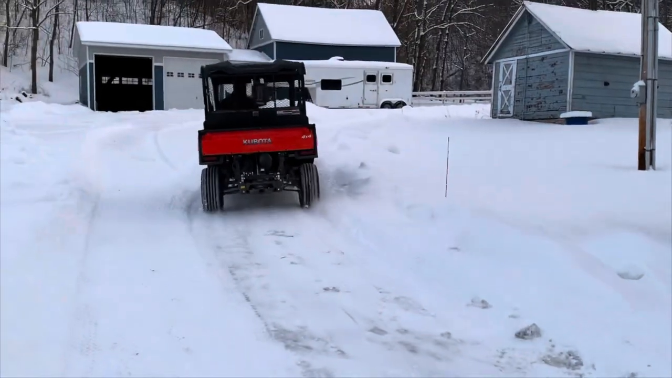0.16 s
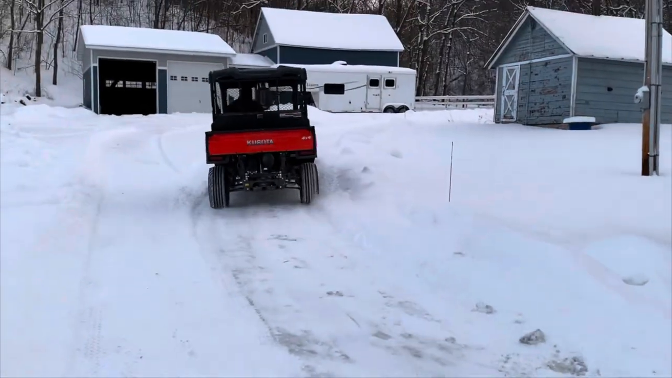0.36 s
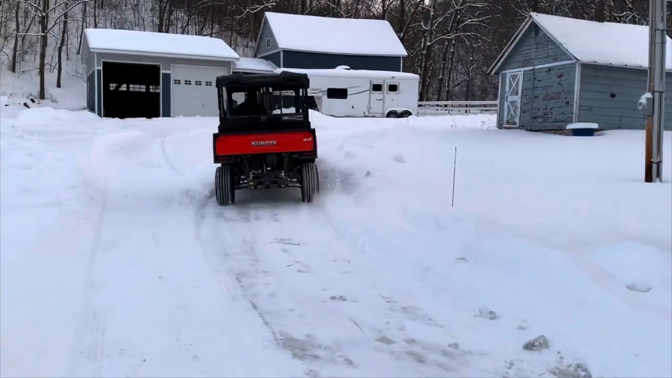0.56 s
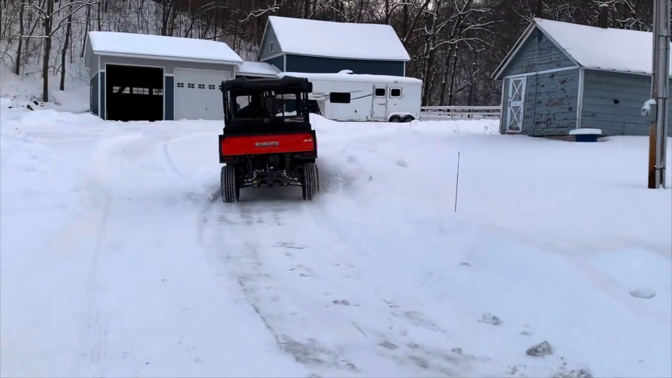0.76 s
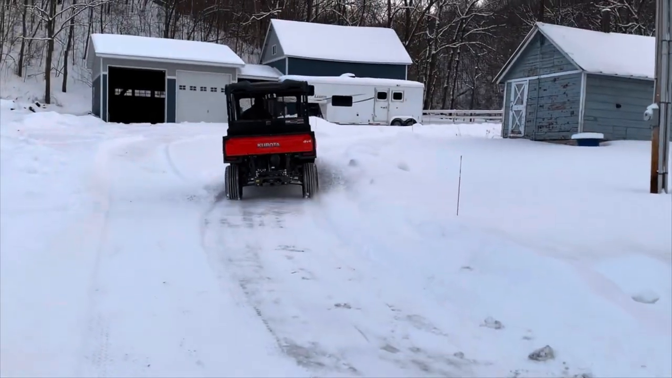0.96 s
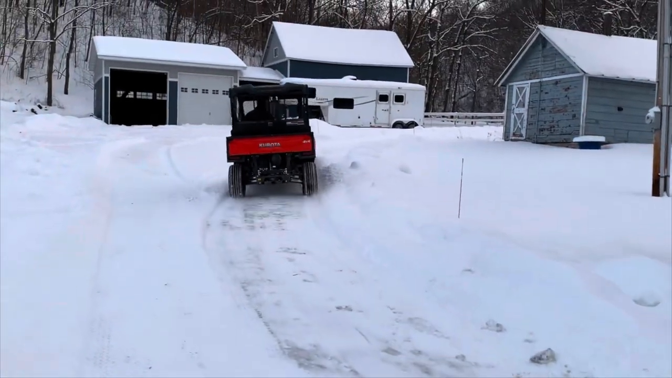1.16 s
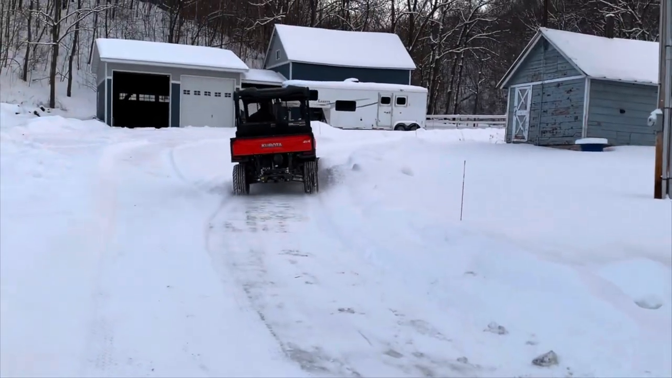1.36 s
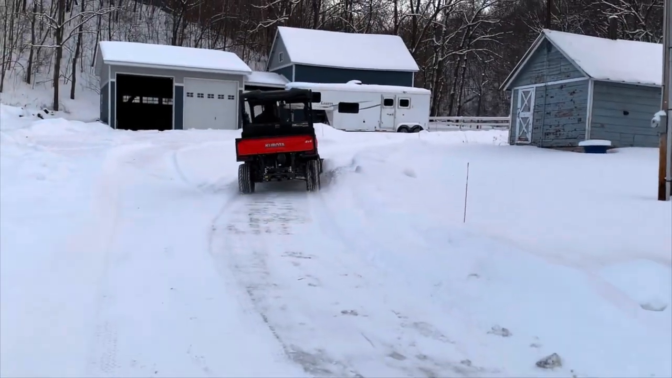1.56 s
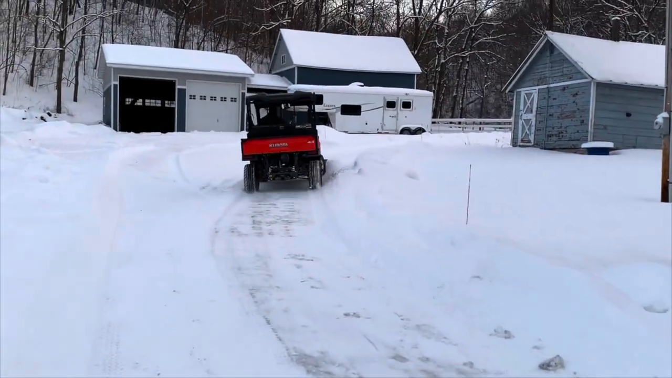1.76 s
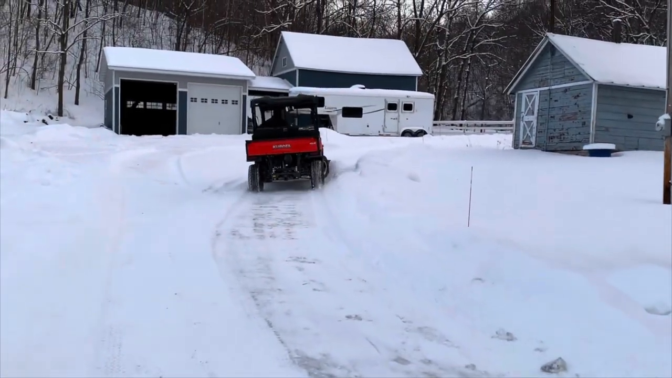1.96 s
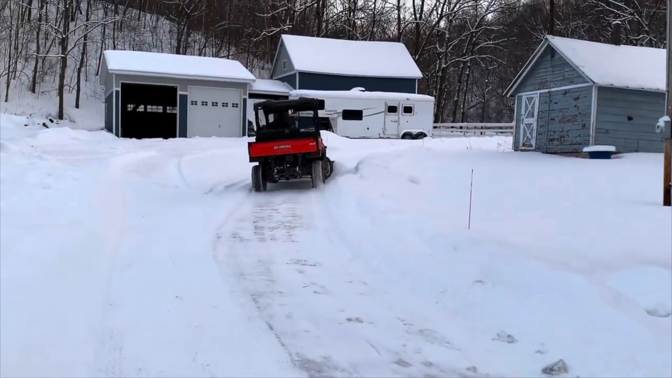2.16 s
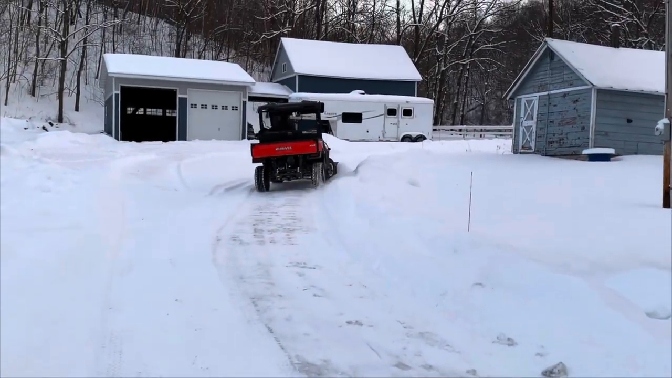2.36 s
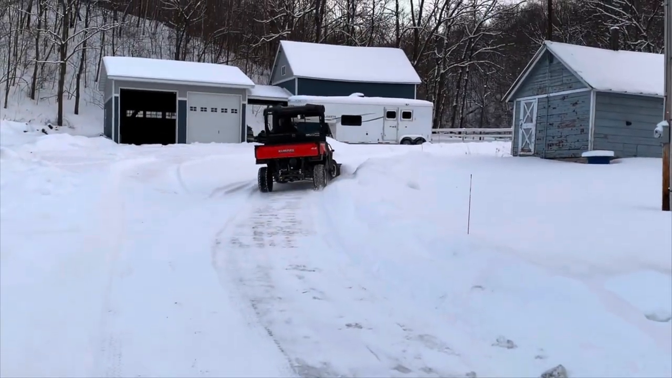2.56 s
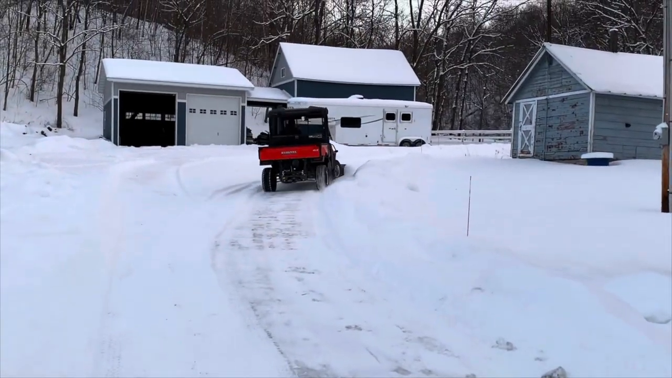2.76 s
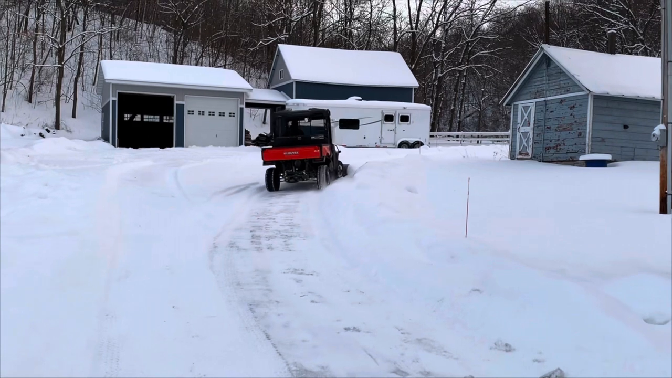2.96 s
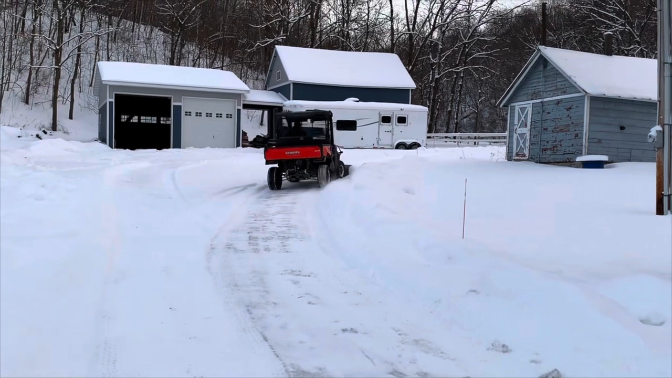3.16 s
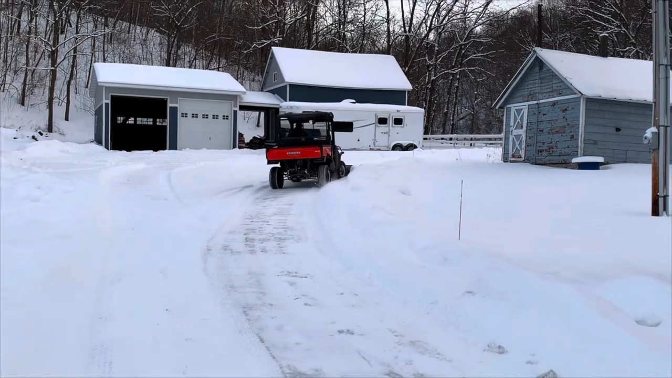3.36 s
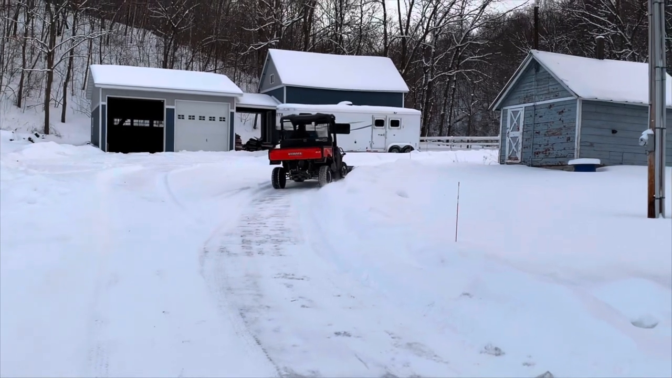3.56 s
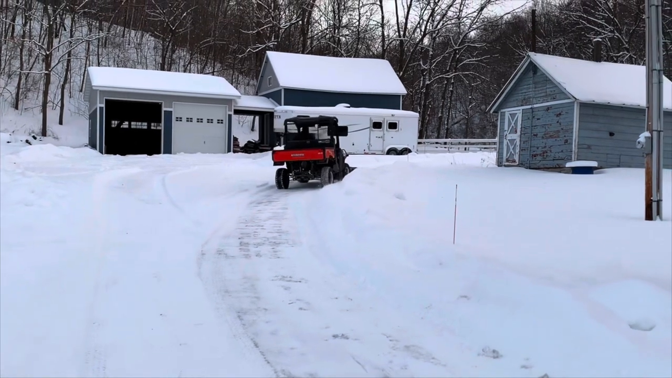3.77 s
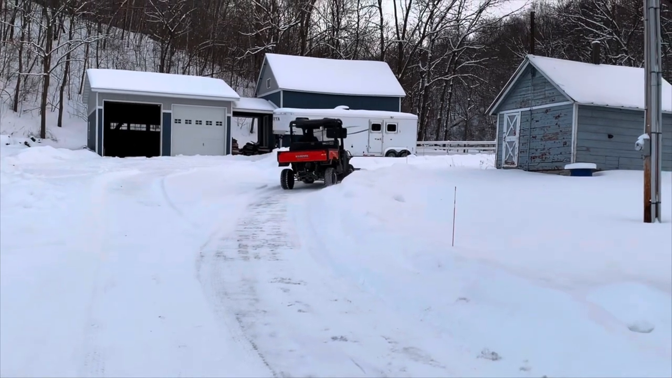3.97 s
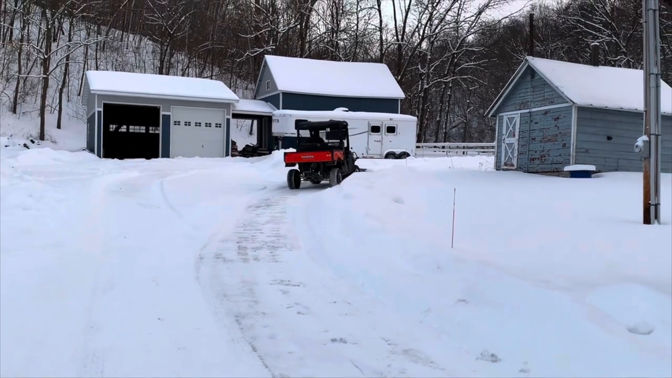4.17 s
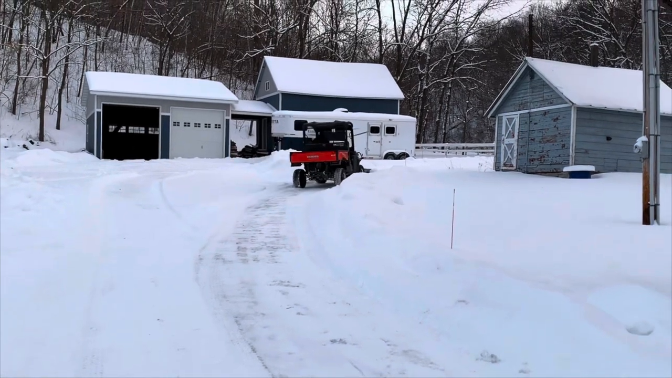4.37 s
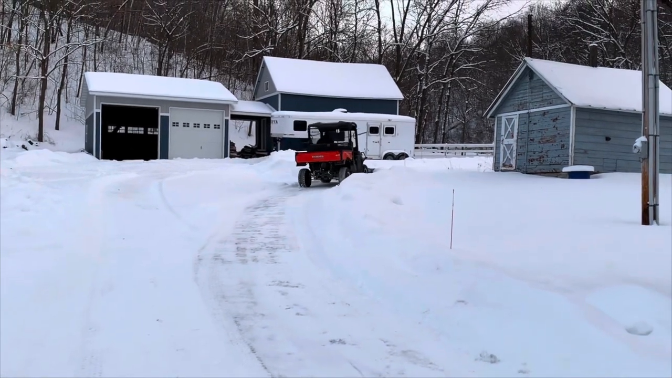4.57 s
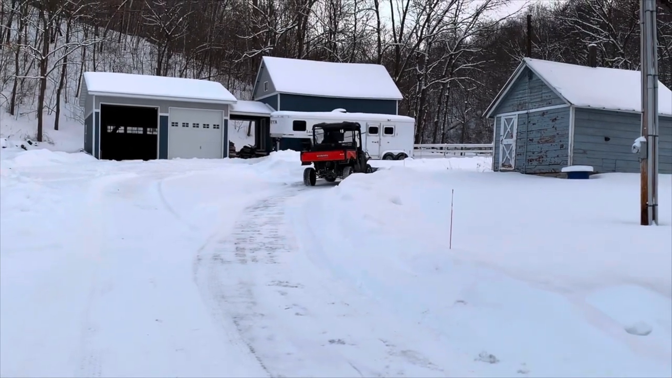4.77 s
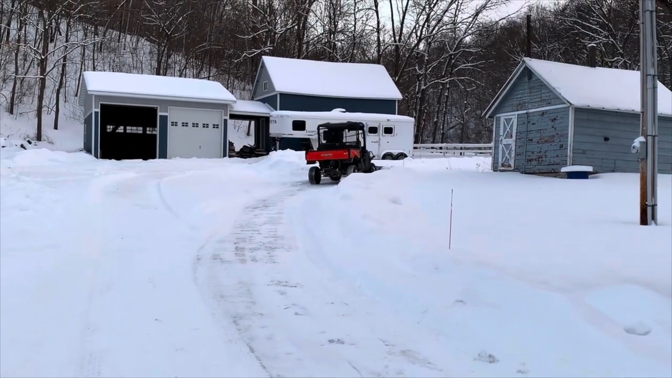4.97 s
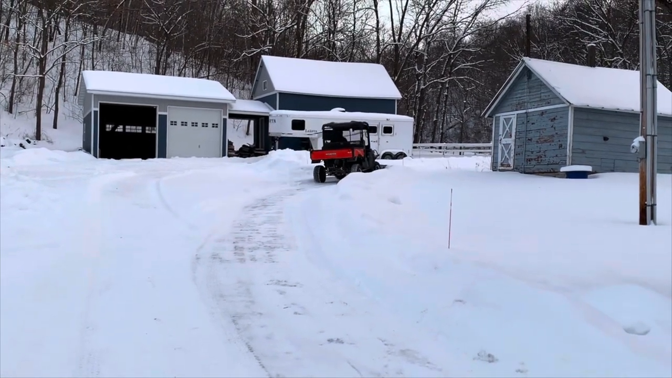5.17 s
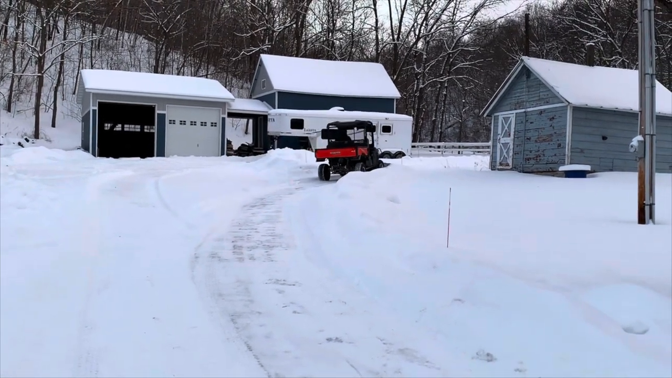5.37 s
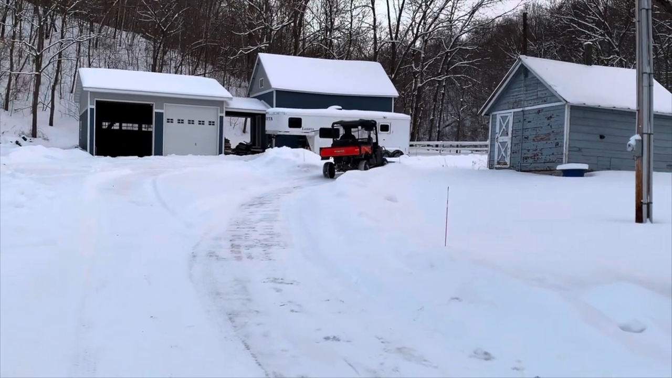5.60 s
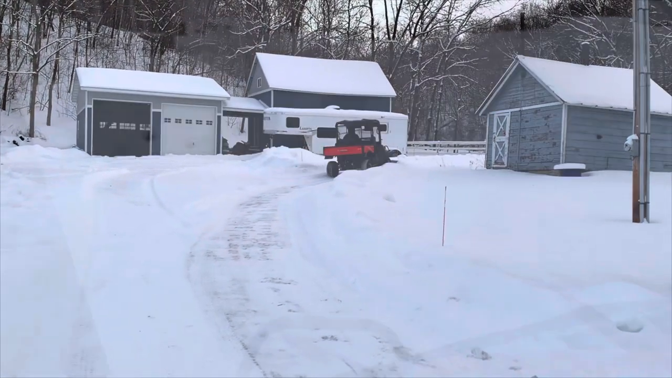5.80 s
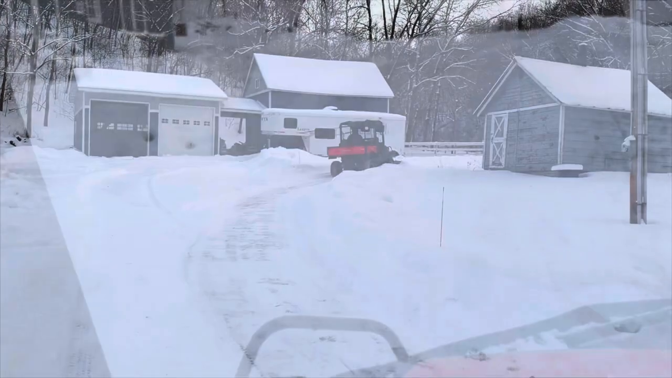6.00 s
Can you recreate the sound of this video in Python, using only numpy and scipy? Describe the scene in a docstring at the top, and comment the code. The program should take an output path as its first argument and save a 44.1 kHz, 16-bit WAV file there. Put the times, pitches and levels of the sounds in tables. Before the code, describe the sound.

Outdoors in a snowy yard, a single-cylinder engine chugs steadily and gradually moves away from the microphone. It opens with a thud of wind and a brief sheet-metal rattle, followed by a light falling whine. The engine then works harder, with sharper knocking and ticking, before easing near the end. Underneath, tyres and a plough blade softly crush snow, while low gusts rumble and sheds return dull echoes.

```python
"""A single-cylinder utility vehicle pushes a plough away up a snowy driveway, firing about 28 times a
second: each firing thumps the muffler, knocks the block and lets out a puff of hiss. At first a gust
buffets two close microphones and a metal guard rattles hard, settling within a second. The gear whine
then sinks through its housing's resonance. From 2.6 s the engine labours and the vehicle turns its flank.
To the end, tyres and blade crush snow, gusts come and go, and sheds throw back dull echoes."""
import sys
import numpy as np
from scipy import signal
from scipy.fft import rfft, irfft
from scipy.io import wavfile
from scipy.ndimage import uniform_filter1d

SR = 44100
rng = np.random.default_rng(int(sys.argv[2]) if len(sys.argv) > 2 else 0)


def unload_wav(signal):
    """Save mono or channel-first audio to the path in sys.argv[1] as 16-bit WAV at rate SR, clipped to [-1, 1]."""
    wavfile.write(
        sys.argv[1],
        SR,
        np.round(np.clip(np.atleast_2d(signal).T, -1, 1) * 32767).astype(np.int16),
    )


N = 266364
CRUISE_PER_S = 28.05   # firings at the governed speed
SHARED = [[1], [0]]   # puts a signal in the row of the sound field that reaches both microphones


def from_db(db):
    """Amplitude ratio of a level in decibels."""
    return 10 ** (np.asarray(db) / 20)


def rms_one(x):
    """Normalisation to an rms of 1."""
    return x / np.sqrt(np.mean(x ** 2) + 1e-20)


def seconds():
    """The time of each sample."""
    return np.arange(N) / SR


def in_time(rows):
    """Linear interpolation of each column of a curve, sample by sample."""
    time_s, *columns = np.transpose(rows)
    return [np.interp(seconds(), time_s, column) for column in columns]


def in_frequency(rows):
    """Interpolation of each column of a spectrum over log frequency, bin by bin."""
    hz, *columns = np.transpose(rows)
    bins_hz = np.maximum(np.arange(N // 2 + 1) * SR / N, 1)
    return [np.interp(np.log(bins_hz), np.log(hz), column) for column in columns]


def noise(spectrum):
    """Spectral shaping: two uncorrelated noises of one colour; rms 1."""
    level_db, = in_frequency(spectrum)
    white = rng.standard_normal((2, N))
    return rms_one(irfft(rfft(white) * from_db(level_db), N))


def drift(rate):
    """Random modulation: a line through rate unit-normal values a second."""
    return np.interp(seconds() * rate, np.arange(4096), rng.standard_normal(4096))


def ring(drive, hz, t60):
    """Damped oscillator: a unit impulse starts a sine of height 1 that falls 60 dB in t60 seconds."""
    decay = from_db(-60 / (t60 * SR))
    step = 2 * np.pi * hz / SR
    return signal.lfilter([0, np.sin(step)], [1, -2 * decay * np.cos(step), decay * decay], drive + 1e-18)


def metal(drive, modes):
    """Modal superposition: the resonances of a casting ring side by side, in alternating polarity."""
    return sum((-1) ** k * from_db(db) * ring(drive, hz, t60) for k, (hz, db, t60) in enumerate(modes))


def blows(rows):
    """Impulse excitation: one click for each (time_s, level_db)."""
    clicks = np.zeros(N)
    for time_s, db in rows:
        clicks[round(time_s * SR)] = from_db(db)
    return clicks


def accents(rows, half_width_s):
    """Amplitude modulation: the level jumps briefly at each (time_s, boost_db)."""
    return from_db(sum(db * np.exp(-((seconds() - time_s) / half_width_s) ** 2) for time_s, db in rows))


def strokes(cycle):
    """Impulse train: one click whenever a cycle is complete."""
    return np.diff(np.floor(cycle), prepend=np.floor(cycle[0]))


def per_firing(cycle, spread_db):
    """Cycle-to-cycle variation: a random gain for every engine cycle."""
    gains = from_db(spread_db * rng.standard_normal(256))
    return gains[np.floor(cycle).astype(int) % 256]


def burst(cycle, centre, rise, fall, rest_db, uneven_db, early_db):
    """Power addition: an early tick, a swell and a resting level form one envelope; times in cycles."""
    tick_at, tick_width = 0.094, 0.037
    swell_cycle = cycle - centre + .5
    offset = swell_cycle % 1 - .5
    swell = np.exp(-np.abs(offset) / np.where(offset < 0, rise, fall))
    swell *= per_firing(swell_cycle, uneven_db)
    tick = from_db(early_db) * np.exp(-((cycle % 1 - tick_at) / tick_width) ** 2)
    tick *= per_firing(cycle, spread_db=3)
    return rms_one(np.sqrt(swell ** 2 + tick ** 2 + from_db(rest_db) ** 2))


# wind between gusts: time_s, level_db
BREEZE = [(0, -42), (2.3, -36.5), (4.15, -31.5), (4.3, -37.5), (6.04, -45.5)]
# gusts: start_s, end_s, level_db
GUSTS = [(0, 0.13, -29.5), (0.2, 0.477, -35.5), (0.872, 1.701, -35), (2.479, 2.947, -31),
         (2.957, 3.498, -34), (3.51, 4.22, -32.5), (4.72, 4.934, -36), (5.824, 6.037, -36)]
# spectra of the deep rumble and of the flutter that hard gusts add: frequency_hz, density_db
RUMBLE = [(15, -39), (30, -17), (45, 2.5), (80, -2.5), (110, -2.5), (150, -18.5), (300, -41), (700, -79)]
FLUTTER = [(45, -25), (80, -3.5), (140, -2), (190, -4), (300, -26.5), (700, -47)]
# single eddies: time_s, peak_db, pitch_hz
BUFFETS = [(0.011, -14, 130), (0.035, -27, 107), (0.066, -18, 109), (0.114, -23, 83), (0.137, -21, 108),
           (0.957, -31, 125), (1.128, -19, 111), (2.493, -21, 115), (2.512, -34, 82.8), (2.561, -19, 139),
           (2.665, -33, 79), (2.678, -18, 80.4), (2.7, -26, 84.6), (2.73, -32, 98), (2.767, -23, 95.2),
           (2.821, -21, 112), (2.853, -25, 89.7), (2.902, -32, 100), (3.5765, -26, 119), (3.649, -22.5, 97),
           (3.681, -26, 84), (3.723, -25, 125), (3.79, -26, 129), (3.817, -31, 125), (3.919, -27, 85),
           (3.969, -22, 77), (4.069, -23, 77.5), (4.167, -23, 87.5), (5.83, -23.5, 85.65), (5.865, -31, 80),
           (5.9247, -19, 81.4), (5.947, -20, 84), (5.967, -26, 90.5), (6.0216, -14.5, 82.6)]
def wind():
    """Turbulence: gusts rumble, brighter when strong; eddies push the microphones for a swing or two."""
    edge_s, half_width_periods = 0.014, 0.79   # of a gust; of a buffet
    t = seconds()
    breeze_db, = in_time(BREEZE)
    gusts = [from_db(db) * np.clip(np.minimum(t - start, end - t) / edge_s + .5, 0, 1)
             for start, end, db in GUSTS]
    strength = np.maximum(from_db(breeze_db), np.max(gusts, axis=0))
    rumble = noise(RUMBLE) * strength
    flutter = from_db(23) * noise(FLUTTER) * strength ** 1.863   # grows faster than the rumble
    thuds = np.zeros(N)
    for time_s, db, hz in BUFFETS:
        periods = (t - time_s) * hz
        thuds += from_db(db) * np.exp(-(periods / half_width_periods) ** 2) * np.cos(2 * np.pi * periods)
    return rumble + flutter + thuds * SHARED


# spectrum of crushed snow: frequency_hz, density_db
SNOW = [(100, -23), (300, -8), (470, -14), (850, -4), (1800, 4), (2900, -4.5), (6000, -14), (10000, -20),
        (16000, -53)]
# tyres and blade in the snow: time_s, level_db
CRUSH = [(0, -40.5), (1, -42.5), (2, -42), (3, -43), (4, -43), (5, -43.5), (5.6, -47), (6.04, -46.5)]
def snow():
    """Granular noise: snow is crushed in small uneven grains."""
    level_db, = in_time(CRUSH)
    return noise(SNOW) * from_db(level_db + 4.0 * drift(300))


# echoes from the sheds: delay_s, gain_db
ECHOES = [(0.046, -15), (0.117, -46), (0.185, -10.5)]
def yard(direct, wall_cut_hz):
    """Reflection: the sheds add a few late, dull copies to the direct sound."""
    dull = signal.sosfilt(signal.butter(1, wall_cut_hz, fs=SR, output="sos"), direct)
    return direct + sum(from_db(db) * np.pad(dull, [(0, 0), (round(delay_s * SR), 0)])[:, :N]
                        for delay_s, db in ECHOES)


# microphone pair: frequency_hz, right_lag_ms, correlation (-1 to 1), left_minus_right_db
PAIR = [(30, .05, 0.62, -1.5), (122, 0.022, 0.83, 1.06), (483, 0.15, 1, 0), (1010, 0.079, 0.78, 4),
        (1420, 0.066, 0.96, 1.5), (2210, 0.058, 0.34, 0.1), (2790, 0.18, 0.4, -0.5), (4000, 0.23, 0.64, 0),
        (5800, 0.193, -0.72, -9.5), (6320, 0.16, 0.73, 0.5), (6960, 0.18, 1, 0), (11000, 0.18, 1, 0),
        (13300, 0.191, 0.95, -0.5), (16000, 0.182, 0.98, 1)]
def microphones(field):
    """Partial coherence: the pair shares the first row and differs by the second; the right one lags."""
    lag_ms, correlation, balance_db = in_frequency(PAIR)
    correlation = np.clip(correlation, -.997, .997)
    shared, apart = rfft(field) * np.sqrt([(1 + correlation) / 2, (1 - correlation) / 2])
    bins_hz = np.arange(N // 2 + 1) * SR / N
    delay = np.exp(-2j * np.pi * bins_hz * lag_ms / 1000)
    left = (shared + apart) * from_db(balance_db / 2)
    right = (shared - apart) * delay * from_db(-balance_db / 2)
    return irfft(np.array([left, right]), N)


def nearness():
    """Spherical spreading: pressure falls as one over the distance; 1 at the start."""
    start_m, away_m_per_s = 4.8, 1.485
    return start_m / (start_m + away_m_per_s * seconds())


def turned():
    """Directivity: the side facing the listener goes from tail (0) to flank (1) as the vehicle turns."""
    start_s, length_s = 2.6, 2.6
    return np.clip((seconds() - start_s) / length_s, 0, 1)


# engine speed: time_s, firings_per_s
SPEED = [(0.0, 27.56), (0.18, 28.1), (0.84, 27.76), (1.02, 27.03), (2.0, 28.94), (2.38, 28.16), (2.6, 29.5),
         (2.8, 29.15), (2.96, 29.9), (3.46, 29.63), (3.74, 28.77), (4.36, 28.29), (4.84, 28.3),
         (5.34, 29.46), (6.04, 29.61)]
def engine_cycle():
    """Phase is the integral of frequency; the exhaust opens at each whole number of cycles."""
    speed, = in_time(SPEED)
    return np.cumsum(speed) / SR + .45


# how hard the engine works against the snow: time_s, knock_db
LOAD = [(0, -1), (0.2, -5.5), (0.5, -7.5), (0.78, -4), (1.25, -3.5), (1.55, 2), (1.95, -1), (2.2, -4.5),
        (2.6, 4.5), (3.45, 6), (4.0, 6), (4.8, 1.3), (5.35, -5), (6.04, -7.5)]
def radiated(level_db, flank_db, load_share, rev_db):
    """Radiation: a part's gain follows distance, heading, load and revs (rev_db per extra firing/s)."""
    load_db, = in_time(LOAD)
    speed, = in_time(SPEED)
    gain_db = level_db + flank_db * turned() + load_share * load_db + rev_db * (speed - CRUISE_PER_S)
    return nearness() * from_db(gain_db)


def thump(cycle, modes, lag):
    """Periodic excitation: a push per firing, lag cycles late, rings low modes; rms 1."""
    pulses = strokes(cycle - lag) * per_firing(cycle - lag, spread_db=0.37)
    tone = sum(np.sign(polarity) * from_db(db) * ring(pulses, hz, t60) for hz, db, t60, polarity in modes)
    bass_cut = signal.butter(2, 59.0, "high", fs=SR, output="sos")   # a small source radiates little bass
    return rms_one(signal.sosfilt(bass_cut, tone))


# gear mesh, sinking with the ground speed: time_s, pitch_hz
MESH_PITCH = [(0, 706), (1.1, 631.6), (1.5, 624), (1.95, 617.6), (2.3, 611), (2.62, 619), (2.85, 596.3),
              (4.6, 580), (6.04, 569)]
# its octave, at the start distance: time_s, level_db
MESH_OCTAVE = [(0.5, -52), (0.9, -51), (1.3, -47), (1.8, -55), (3.7, -52), (4.35, -46), (4.65, -52),
               (5.5, -63)]
def gear_whine():
    """Forced resonance: the mesh tone peaks as it meets the housing's mode; its octave sings above."""
    housing_hz, bandwidth_hz, on_resonance_db = 624, 18.6, -43
    hz, = in_time(MESH_PITCH)
    octave_db, = in_time(MESH_OCTAVE)
    phase = 2 * np.pi * np.cumsum(hz * (1 + 0.00793 * drift(45))) / SR
    resonance = 1 / np.hypot(1, 2 * (hz - housing_hz) / bandwidth_hz)
    tone = from_db(on_resonance_db) * resonance * np.sin(phase) + from_db(octave_db) * np.sin(2 * phase)
    return np.sqrt(2) * nearness() * tone * from_db(4.2 * drift(30))


# cargo bed modes: pitch_hz, gain_db, t60_s, polarity
BED = [(251.4, -1, 0.45, 1), (277, -10, 0.098, -1), (317.5, -2, 0.32, 1), (364.6, -1.5, 0.092, -1)]
def cargo_bed(cycle):
    """Plate resonance: the bed drums with each firing."""
    gain = radiated(level_db=-40.5, flank_db=-7.5, load_share=0.23, rev_db=-3.5)
    return gain * thump(cycle, BED, lag=0.2514)


# spectrum of the panels: frequency_hz, density_db
BODYWORK = [(130, -34), (210, -2), (335, 2.5), (440, -12.5), (560, -7.5), (800, -5.5), (1150, -19.5),
            (1500, -6), (2800, -24.5)]
def bodywork(cycle):
    """Structure-borne sound: the panels buzz after each firing."""
    gain = radiated(level_db=-34.5, flank_db=-6, load_share=0.15, rev_db=0.97)
    buzz = gain * noise(BODYWORK)
    return buzz * burst(cycle, centre=0.3, rise=0.07, fall=0.52, rest_db=2.0, uneven_db=4.5, early_db=-6)


# spectrum of the guard: frequency_hz, density_db
GUARD = [(450, -29), (650, -12), (830, -0.5), (900, 6.5), (985, 7.5), (1060, 0), (1250, -5.5),
         (1700, -24.5)]
# jolts that make it clank: time_s, boost_db
CLANKS = [(0.358, 11), (0.75, 9), (1.794, 13.5), (1.865, 3), (2.666, 9)]
def guard(cycle):
    """Forced vibration: engine and jolts make a sheet-metal guard rasp near one pitch, hard at first."""
    extra_db, settled_s, fade_s = 8, 0.99, 0.74
    unsettled = np.clip((settled_s - seconds()) / fade_s, 0, 1)
    gain = radiated(level_db=-46, flank_db=1.5, load_share=-0.15, rev_db=1) * from_db(extra_db * unsettled)
    rasp = gain * noise(GUARD) * accents(CLANKS, half_width_s=0.009)
    return rasp * burst(cycle, centre=0.41, rise=0.26, fall=0.29, rest_db=-12, uneven_db=1.5, early_db=-1.5)


# spectrum of the bright hiss puffs as heard, with a narrow dip near 8.4 kHz: frequency_hz, density_db
HISS = [(1500, -32), (2800, -20), (5000, -1.5), (6400, -5), (7400, 1), (8400, -17), (9500, 3.5), (10300, 7),
        (11400, 4), (13000, 3), (16000, -0.5)]
# strength of the puffs: time_s, relative_level_db
PUFFS = [(0.0, -44), (0.2, -47), (0.42, -47), (0.65, -46.5), (0.75, -41), (1.1, -46.5), (1.32, -48.5),
         (1.52, -42.5), (1.92, -51), (2.15, -49), (2.72, -45.5), (2.92, -46), (3.2, -46), (3.45, -50.5),
         (3.6, -48.5), (4.08, -52.5), (4.3, -49), (4.5, -52), (4.75, -49), (5.25, -55), (5.6, -52),
         (6.0, -56.5)]
def exhaust_hiss(cycle):
    """Jet noise: gas leaves the tailpipe in short bright puffs."""
    puff_db, = in_time(PUFFS)
    hiss = from_db(puff_db + 5) * noise(HISS)
    return hiss * burst(cycle, centre=0.25, rise=0.11, fall=0.23, rest_db=-14, uneven_db=2.4, early_db=-7)


# knocks within one engine cycle: position_cycles, level_db
KNOCKS = [(0.111, -11.5), (0.25, -7), (0.322, -11.5)]
def clatter(cycle, lead, fall, knock_db, rest_db, uneven_db, early_db):
    """Driving force on the metal: combustion shakes it, valves and piston add a cluster of knocks."""
    jitter_cycles = 0.009
    cycle = cycle + lead
    shake = rng.standard_normal((2, N))
    shake *= burst(cycle, centre=0.28, rise=0.11, fall=fall, rest_db=rest_db, uneven_db=1, early_db=early_db)
    knocks = sum(from_db(db) * strokes(cycle - at + jitter_cycles * drift(40)) * per_firing(cycle, uneven_db)
                 for at, db in KNOCKS)
    return shake + from_db(knock_db) * rms_one(knocks) * SHARED


def evened(x, evenness=0.78):
    """Compression: the energy of each firing is brought close to that of the others; rms 1."""
    power = uniform_filter1d(x ** 2, round(SR / CRUISE_PER_S), axis=-1)
    return rms_one(x / (power + 1e-12) ** (evenness / 2))


# valve gear modes: pitch_hz, gain_from_behind_db, flank_gain_db, t60_s
VALVES = [(3490, 0.5, -5, 0.0082), (4010, -2, 0.5, 0.0068), (4700, -2, 0.5, 0.0054), (5650, 1, -1.5, 0.006),
          (6220, 1, 0.5, 0.0056), (7340, -5.5, 5, 0.0041)]
# steady ticking, at the start distance: time_s, level_db
VALVE_LEVEL = [(0, -68), (0.55, -55), (0.85, -48), (1.1, -46), (1.6, -43.5), (1.95, -50), (2.35, -45.5),
               (2.6, -42.5), (3.3, -46.5), (3.65, -42), (4.05, -44), (4.75, -41.5), (5.5, -41.5),
               (6.04, -54)]
# sharp metallic ticks: time_s, impulse_db
TICKS = [(3.033, -29), (3.575, -33), (4.699, -33)]
def valve_gear(cycle):
    """Modal directivity: bright ticks change their ring with the heading; a few stand out sharply."""
    wander_db = 2.2   # each mode swells and fades as the vehicle sways
    drive = clatter(cycle, lead=0.015, fall=0.2, knock_db=-9, rest_db=-14, uneven_db=1.2, early_db=-7.5)
    tone = sum((-1) ** k * from_db(db + flank_db * turned() + wander_db * drift(4)) * ring(drive, hz, t60)
               for k, (hz, db, flank_db, t60) in enumerate(VALVES))
    sharp = metal(blows(TICKS), [(hz, db, t60) for hz, db, _, t60 in VALVES])
    level_db, = in_time(VALVE_LEVEL)
    return nearness() * from_db(level_db) * evened(tone) + sharp * SHARED


# modes of the engine block and of its cover: pitch_hz, gain_db, t60_s
BLOCK = [(1820, 1.5, 0.0096), (2160, 2.5, 0.0085), (2298, 0.5, 0.013)]
COVER = [(1388, -6.5, 0.028), (1520, -10, 0.024), (1647, 2, 0.033), (1740, -2, 0.027)]
# ringing of the cover, at the start distance: time_s, level_db
COVER_LEVEL = [(0, -41.5), (0.3, -40), (0.6, -37.5), (0.75, -33.5), (0.95, -38), (1.15, -38.5),
               (1.5, -36.5), (1.75, -40.5), (1.95, -43.5), (2.3, -40), (2.6, -34), (3.0, -41),
               (3.55, -32.5), (4.3, -34), (4.9, -33.5), (5.25, -42.5), (5.45, -40.5), (6.04, -52)]
# firings that knock harder than the rest: time_s, boost_db
HARD_KNOCKS = [(0.279, 7), (0.389, 3), (0.714, 4), (0.82, 3), (0.931, 6), (1.617, 0.5), (1.687, 2.5),
               (1.794, 4), (2.457, 4), (2.63, 6.5), (3.172, 1.5), (3.374, 2), (4.097, 1), (4.306, 1),
               (4.548, 4.5), (4.625, -1), (4.975, 1), (5.188, 1.5), (5.258, 3)]
def diesel_knock(cycle):
    """Impact excitation: each firing cracks in the block and rings on in the cover, some harder."""
    slap_db, slap_lead_s = -34, 0.00144   # the piston slaps just before a hard knock peaks
    on_block = clatter(cycle, lead=0.0043, fall=0.28, knock_db=-2.5, rest_db=-11, uneven_db=1, early_db=-8)
    on_cover = clatter(cycle, lead=0.035, fall=0.15, knock_db=1, rest_db=-20, uneven_db=2, early_db=-8)
    block_gain = radiated(level_db=-41.5, flank_db=4, load_share=0.95, rev_db=-0.5)
    crack = block_gain * evened(metal(on_block, BLOCK))
    cover_db, = in_time(COVER_LEVEL)
    ringing = nearness() * from_db(cover_db) * evened(metal(on_cover, COVER))
    slaps = blows([(time_s - slap_lead_s, slap_db + db) for time_s, db in HARD_KNOCKS])
    knocking = (crack + ringing) * accents(HARD_KNOCKS, half_width_s=0.006)
    return knocking + metal(slaps, COVER + BLOCK) * SHARED


# rocking mode: pitch_hz, gain_db, t60_s, polarity
MOUNTS = [(58, 0, 0.019, 1)]
def mounts(cycle):
    """Mass on a spring: the engine rocks on its mounts."""
    gain = radiated(level_db=-42.5, flank_db=3.5, load_share=-0.54, rev_db=2)
    return gain * thump(cycle, MOUNTS, lag=0.2793)


# tailpipe modes: pitch_hz, gain_db, t60_s, polarity
TAILPIPE = [(166.2, 3, 0.076, 1), (203.5, 0, 0.035, -1), (222, -8.5, 0.16, 1)]
def tailpipe(cycle):
    """Standing waves: the exhaust pulses make the pipe purr."""
    gain = radiated(level_db=-35.5, flank_db=1, load_share=-0.76, rev_db=-6.5)
    return gain * thump(cycle, TAILPIPE, lag=0.036)


# muffler chambers: pitch_hz, gain_db, t60_s, polarity
MUFFLER = [(118.7, 4, 0.063, 1), (129.3, 6.5, 0.027, -1)]
def muffler(cycle):
    """Cavity resonance: each exhaust pulse makes the chambers boom."""
    gain = radiated(level_db=-22, flank_db=-4.5, load_share=0.01, rev_db=-1)
    return gain * thump(cycle, MUFFLER, lag=0.031)


def scene():
    """Superposition: one cycle drives all the engine's sounds; whine, snow and wind add to them."""
    cycle = engine_cycle()
    drone = muffler(cycle) + mounts(cycle) + tailpipe(cycle) + cargo_bed(cycle)
    panels = bodywork(cycle) + guard(cycle)
    tones = (drone + gear_whine()) * SHARED
    noises = panels + diesel_knock(cycle) + valve_gear(cycle) + exhaust_hiss(cycle)
    return microphones(tones + yard(noises, wall_cut_hz=7200) + snow() + wind())


def record(dry):
    """Band limiting: a steep low-pass cuts the highest treble."""
    cutoff_hz = 15850
    return signal.sosfilt(signal.ellip(12, .1, 90, cutoff_hz, fs=SR, output="sos"), dry)


dry = scene()
out = record(dry)
unload_wav(out)
```